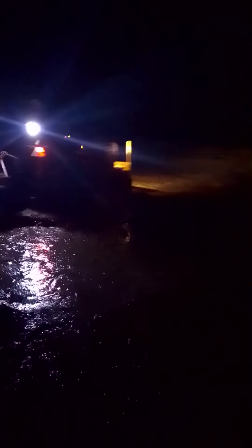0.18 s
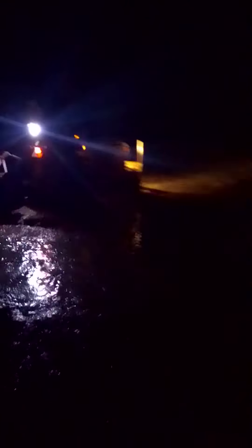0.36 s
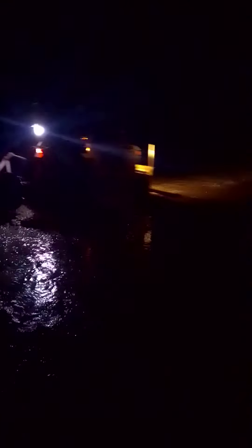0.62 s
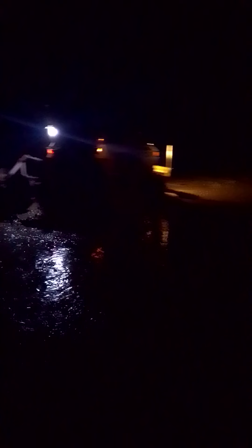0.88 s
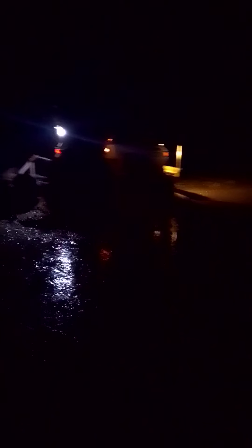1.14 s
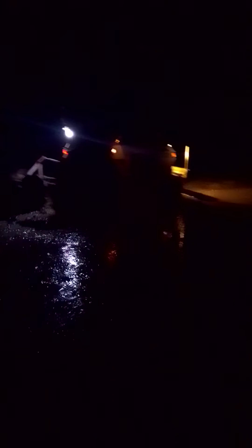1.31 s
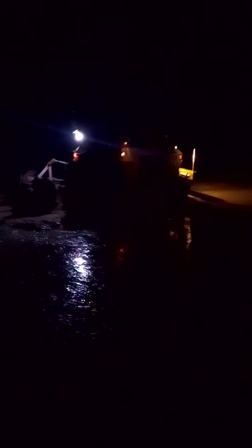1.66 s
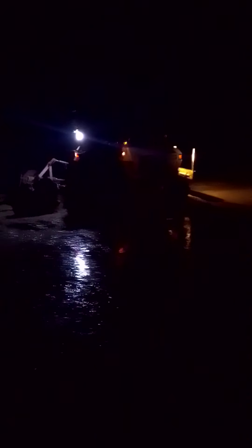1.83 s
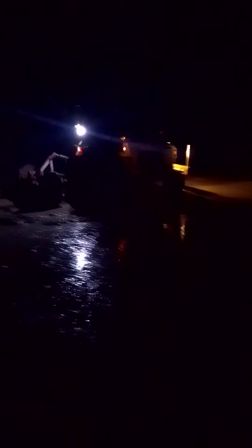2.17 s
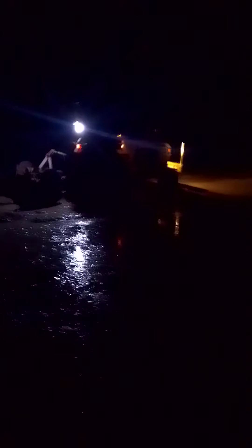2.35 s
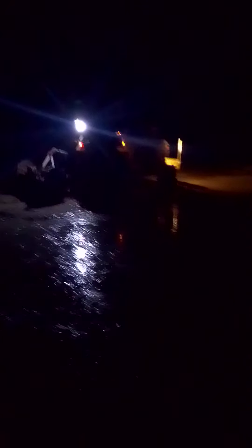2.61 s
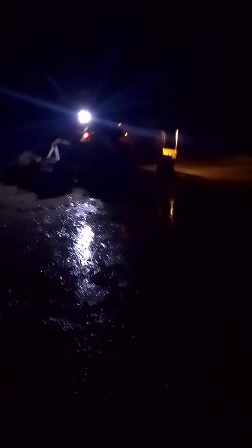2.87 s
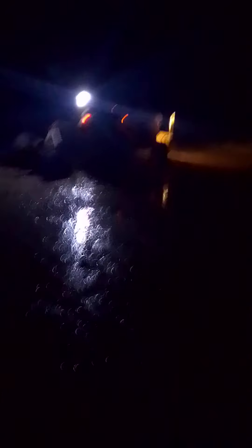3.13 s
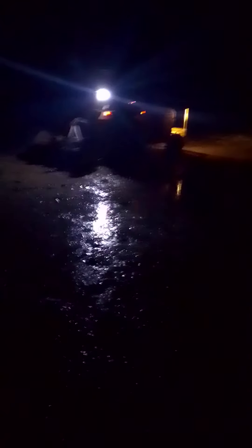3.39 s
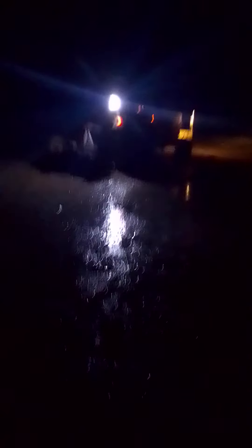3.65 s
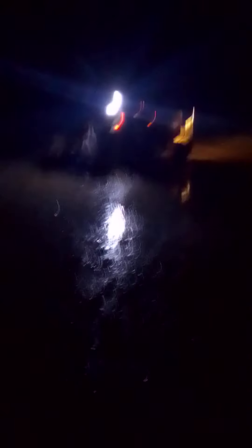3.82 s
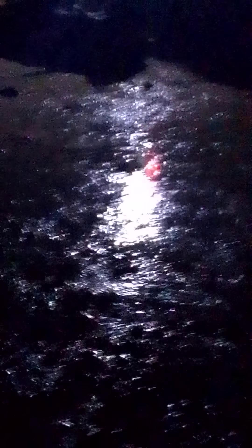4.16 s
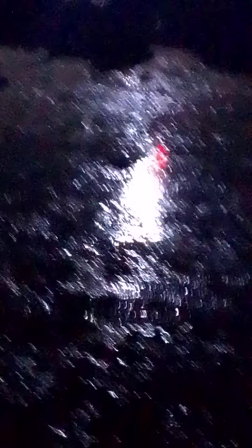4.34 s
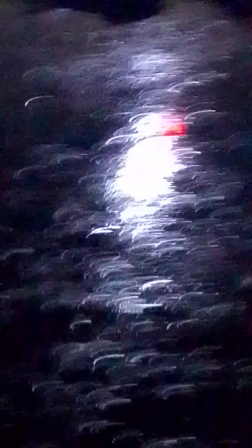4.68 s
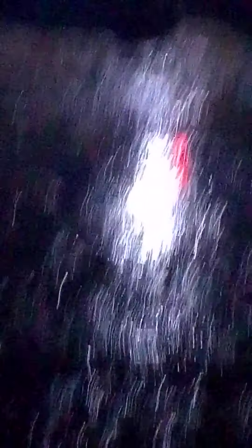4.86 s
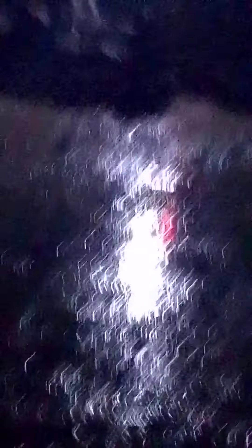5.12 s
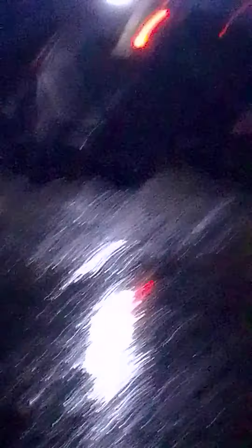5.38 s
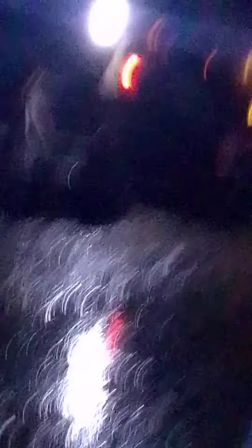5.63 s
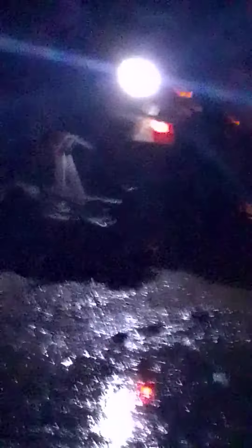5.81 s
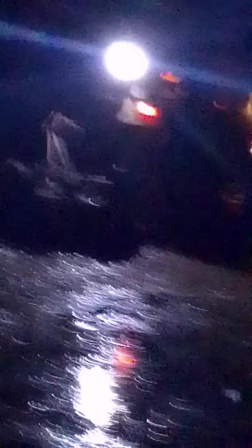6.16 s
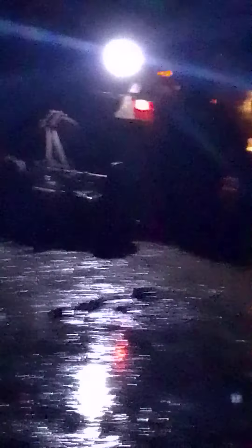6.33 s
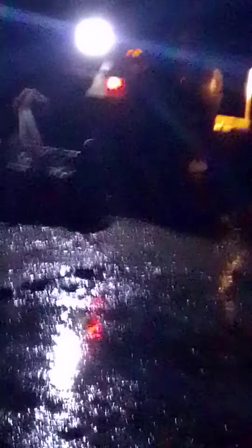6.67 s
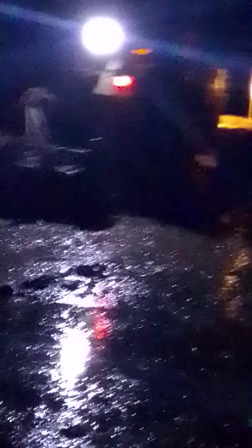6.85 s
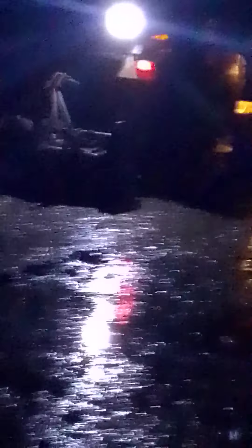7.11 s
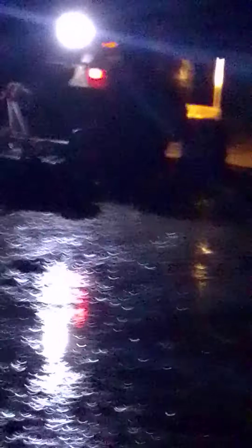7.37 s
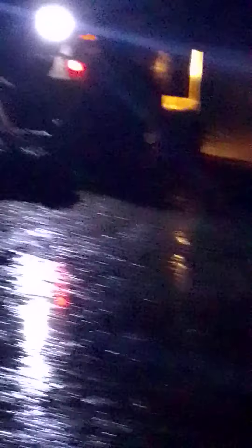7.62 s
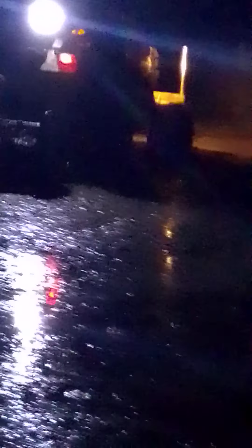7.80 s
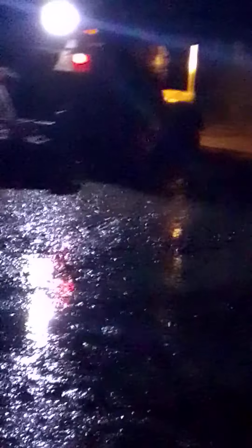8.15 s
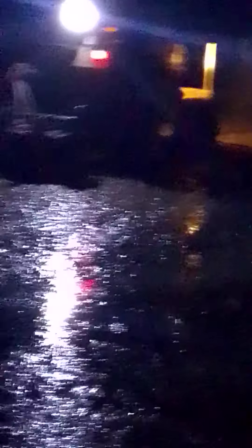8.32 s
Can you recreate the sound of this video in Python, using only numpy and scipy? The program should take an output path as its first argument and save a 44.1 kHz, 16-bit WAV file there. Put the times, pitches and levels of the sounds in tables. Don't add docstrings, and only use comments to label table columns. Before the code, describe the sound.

A phone picks up a working tractor some way off across watery mud. Its rapid diesel knocking is uneven, with random harder blows ringing like struck iron. Gear noise and a faint whine sit underneath with a blurred exhaust drone. Loose tackle shakes brightly early on, with later brief jolts; the sound gets weaker, thinner and patchier towards the end.

```python
import sys
import numpy as np
from scipy import signal
from scipy.fft import rfft, irfft, next_fast_len
from scipy.io import wavfile
from scipy.ndimage import uniform_filter1d, map_coordinates

SR = 44100
rng = np.random.default_rng(int(sys.argv[2]) if len(sys.argv) > 2 else 0)


def unload_wav(signal):
    wavfile.write(
        sys.argv[1],
        SR,
        np.round(np.clip(np.atleast_2d(signal).T, -1, 1) * 32767).astype(np.int16),
    )


def decibels_to_gain(level_db):
    exponent = np.asarray(level_db, float) / 20
    return 10 ** exponent


N = 374409

FIRING_HZ = 32.8
MEAN_DB = -40
HIGH_CUT_DB = -24


def in_time(rows, t):
    s, *columns = np.transpose(rows)
    return [np.interp(t, s, column) for column in columns]


def colour(x, spectrum):
    size = next_fast_len(N)
    hz, level_db = np.transpose(spectrum)
    axis = np.log(np.fft.rfftfreq(size, 1 / SR) + 1)
    gain = decibels_to_gain(np.interp(axis, np.log(hz), level_db, -120, -120))
    y = irfft(rfft(x, size) * gain, size)[:N]
    return y / np.sqrt(np.mean(y ** 2))


def drift(rate):
    knots = rng.standard_normal(600)
    return np.interp(np.arange(N) / SR * rate, np.arange(600), knots)


def ring(clicks, hz, t60):
    r, w = decibels_to_gain(-60 / (t60 * SR)), 2 * np.pi * hz / SR
    return signal.lfilter([0, np.sin(w)], [1, -2 * r * np.cos(w), r * r], clicks + 1e-18)


def between(x, low, high, soft):
    return 0.23 * (1 + np.tanh((x - low) / soft)) * (1 + np.tanh((high - x) / soft))


# (time [s], lead [firings])
CRANK_LEAD = [(0.0, .17), (0.8, 0.33), (1.2, 0.46), (1.6, 0.4), (2.4, 0.3), (3.2, 0.41), (4.8, 0.54),
              (6.0, 0.3), (6.4, .38), (7.2, 0.22), (7.6, 0.28), (8.49, 0.091)]


def count_firings(t):
    return FIRING_HZ * t + in_time(CRANK_LEAD, t)[0]


def strikes(firings):
    return np.flatnonzero(np.diff(np.floor(firings - .76)) > 0)


# (time [s], level [dB], gear load [dB])
LOUDNESS = [(0.0, -38.5, 0.5), (0.66, -37, 1.5), (1.06, -38.5, 2), (1.42, -36, 3), (2.05, -35.5, 0),
            (2.91, -38, 0.5), (3.17, -36, 0), (3.64, -39, 1.5), (3.81, -37, -0.5), (3.97, -41.5, 0),
            (4.33, -39.5, 0.5), (5.93, -41, 1), (6.43, -45, 0), (6.62, -42, -1), (7.38, -45, -1.5),
            (8.49, -44.5, 1)]


def engine_load(t):
    return in_time(LOUDNESS, t)


CYLINDER_DB = [-2.5, -7.5, -10]


def bursts(firings, delay, rise_s, fall_s, steady, spread_db, uneven):
    late = firings - delay + 3
    count = late.astype(int)
    age = late % 1 / FIRING_HZ
    size_db = uneven * np.array(CYLINDER_DB)[count % 3] + spread_db * rng.standard_normal(300)[count]
    flare = decibels_to_gain(size_db) * (1 - np.exp(-age / rise_s)) * np.exp(-age / fall_s)
    return rng.standard_normal(N) * (steady + flare)


# (frequency [Hz], level [dB])
BLOCK = [(2150, -38), (2450, -7), (2650, 1), (2800, 3), (3000, 2), (3300, 2.5), (3750, 1), (4200, -3),
         (4800, -8), (5200, -52)]
# (frequency [Hz], level [dB])
VALVES = [(1650, -26), (1850, -2), (2050, -2.5), (2200, -1), (2400, -5), (2700, -7.5), (3200, -33)]


def block(firings):
    at = strikes(firings)
    draws = rng.standard_normal((300, 23))[:len(at)]
    modes = np.zeros(N)
    for k, hz in enumerate(np.linspace(2450, 4800, 22)):
        clicks = np.zeros(N)
        clicks[at] = decibels_to_gain(3.5 * draws[:, k] + .7 * draws[:, 22]) * np.sign(draws[:, k - 1])
        modes += ring(clicks, hz, 0.075)
    steady = .22 + .2 * (firings / 280) ** 3
    noise = bursts(firings, delay=.74, rise_s=.0011, fall_s=.008, steady=steady, spread_db=.8, uneven=1.1)
    valves = bursts(firings, delay=0.84, rise_s=0.0046, fall_s=0.013, steady=0.35, spread_db=-2.5, uneven=0.29)
    return colour(noise + decibels_to_gain(-33.0) * modes, BLOCK) + decibels_to_gain(-5.0) * colour(valves, VALVES)


# (start time [s], end time [s], frequency [Hz], lift [dB])
FACES = [
    (-1, 3.4, 3740, 3),
    (1.5, 5.1, 2200, 5),
    (5.2, 7.1, 2850, 3),
    (1.4, 2.5, 4730, 19),
    (6.6, 6.84, 4880, 14),
    (6.62, 7.05, 1550, 7),
    (5.6, 7.8, 1020, 3),
    (6.8, 9, 2400, 5),
    (4.0, 5.8, 3450, 3),
]


def face_pitch(s):
    early, late = FACES[0], FACES[2]
    return np.interp(s, [early[1], late[0]], [early[2], late[2]])


def face_lift(hz, t):
    lift = 0
    for start, end, face_hz, lift_db in FACES:
        lift = lift + lift_db * between(hz, face_hz * .97, face_hz * 1.03, 40) * between(t, start, end, .1)
    return lift


def ordinary_knocks(firings, level_db):
    over_db, spread_db, detune = 9.5, 1.2, 0.1204
    rows = []
    for i, d in zip(strikes(firings), rng.standard_normal((300, 4))):
        hz = face_pitch(i / SR) * (1 - detune * abs(d[1]))
        rows.append((i / SR, level_db[i] + over_db + spread_db * d[0], hz, *d[2:]))
    return rows


# (first time [s], peak level [dB], ringing [Hz], run length [firings])
HARD_RUNS = [(0.171, -21.5, 3890, 1), (0.3546, -23, 3850, 2), (0.474, -26, 3290, 1), (0.567, -24, 3860, 1),
             (0.6629, -26, 2930, 1), (0.7163, -21, 3730, 1), (0.9288, -24.5, 2160, 1),
             (1.1069, -26.5, 2160, 1), (1.2008, -19, 3710, 1), (1.505, -27.5, 3730, 1),
             (1.5688, -20, 3670, 2), (1.6586, -21, 3080, 2), (1.9036, -25.5, 3870, 2),
             (1.9956, -25, 3400, 3), (2.1181, -24, 3830, 2), (2.209, -25.5, 2780, 3),
             (2.3017, -21, 2840, 2), (2.9387, -24.5, 3520, 2), (3.1194, -22.5, 3720, 1),
             (3.2745, -25.5, 3760, 2), (3.824, -23, 3000, 1), (4.3993, -23, 2675, 1), (4.461, -21, 3180, 1),
             (5.103, -21, 2700, 2), (5.5313, -28, 2750, 3), (5.777, -26.5, 2870, 1), (5.8396, -22, 2856, 3),
             (6.6024, -22.5, 2920, 3), (7.0903, -27.5, 2710, 2), (7.8576, -27.5, 3630, 2)]


def hard_runs():
    spread_db, detune = -1.5, 0.049
    rows = []
    for (s, peak_db, hz, run), draws in zip(HARD_RUNS, rng.standard_normal((30, 4, 4))):
        for k in range(run):
            d, vary = draws[k], k > 0
            rows.append((s + k / FIRING_HZ, peak_db + spread_db * d[0] * vary,
                         hz * (1 + detune * d[1] * vary), *d[2:]))
    return rows


def ringing_knocks(firings, level_db):
    out, length = np.zeros(N + SR), 1800
    click = np.eye(1, length)[0]
    onset = 1 - np.exp(-np.arange(length) / SR / 0.00057)
    for s, peak_db, hz, chance, other in hard_runs() + ordinary_knocks(firings, level_db):
        cluster = ring(click, hz, 0.046)
        cluster = cluster + 0.23 * ring(click, hz + 250 * chance, 0.015)
        cluster = cluster - 0.76 * ring(click, hz + 600 * other, 0.022)
        start = max(round(s * SR), 0)
        out[start:start + length] += decibels_to_gain(peak_db - 7.0) * cluster * onset
    return out[:N]


# (frequency [Hz], level [dB per Hz])
EXHAUST = [(225, -45), (262, -53.5), (320, -13), (363, -2), (388, 1.5), (481, -1), (560, -8), (620, -18),
           (800, -42)]


def exhaust(firings, t, load_db):
    puffs = bursts(firings, delay=.9, rise_s=0.001, fall_s=0.0022, steady=1.3, spread_db=6.0, uneven=0.24)
    level_db = -45.5 + 0.51 * load_db - 0.86 * t + 0.7 * drift(6.0)
    return decibels_to_gain(level_db) * colour(puffs, EXHAUST)


# (frequency [Hz], level [dB])
GEAR = [(540, -55), (600, -9), (880, -10), (990, -6.5), (1120, -10), (1310, -2.5), (1500, -3), (1750, -6.5),
        (1900, -5)]
# (pitch [multiples of the firing rate], level under the gear noise [dB])
WHINES = [
    (24, -18),
    (30, -16),
    (40, -17),
    (50, -23.5),
    (62, -8.5),
]


def gears(firings, t, load_db, pull_db):
    noise = bursts(firings, delay=0.11, rise_s=0.0045, fall_s=0.0062, steady=0.49, spread_db=4.0, uneven=0.47)
    out = colour(noise, GEAR)
    for multiple, under_db in WHINES:
        phase = 2 * np.pi * multiple * firings + 0.73 * drift(14.0)
        out = out + decibels_to_gain(under_db + 5.2 * drift(4.0)) * np.sin(phase)
    level_db = -49 + 0.78 * load_db - 0.1866 * t + pull_db
    return decibels_to_gain(level_db + 3.0) * out


# (start time [s], end time [s], rattle lift [dB], jingle lift [dB])
JOLTS = [
    (-.1, .07, 7.5, 6),
    (-.1, .3, 3.5, 6),
    (.95, 1.15, 1, 3),
    (1.28, 2.227, 5.5, 8),
    (1.453, 1.857, 9.5, 5.5),
    (3.17, 3.445, 2, 8.5),
    (4.45, 4.65, 3, 9),
    (4.75, 4.946, 1.5, 8),
    (5.12, 5.346, 5, 8.5),
    (6.604, 6.906, 6.5, 6.5),
]


def tackle(t):
    load_db = engine_load(t)[0] - MEAN_DB
    rattle_db, jingle_db = -74.5 + 0.88 * load_db, -83 + 0.7 * load_db
    for start, end, rattle_lift, jingle_lift in JOLTS:
        jolt = (1 + np.tanh((t - start) / 0.048)) * (1 + np.tanh((end - t) / 0.059)) / 4
        rattle_db = rattle_db + rattle_lift * jolt
        jingle_db = jingle_db + jingle_lift * jolt
    return rattle_db, jingle_db


def looseness(t):
    return np.clip((tackle(t)[1] + 79 + .7 * t) / 9, 0, 1)


def shaking(knocks, power):
    fast = uniform_filter1d(knocks ** 2, 130)
    shake = (fast / uniform_filter1d(fast, 9000)) ** power
    return rng.standard_normal(N) * shake / np.sqrt(uniform_filter1d(shake ** 2, 9000))


# (frequency [Hz], level [dB])
RATTLE = [(2820, -28), (4800, -3), (5590, -6.5), (6990, -4.5), (7790, -3.5), (8490, -4.5), (9460, -8),
          (9800, -24), (12700, -42), (21600, -120)]
# (frequency [Hz], level [dB])
JINGLE = [(5590, -36), (9500, -4), (10600, -5), (12900, -7), (13800, -9), (15100, -5.5), (15900, -13)]


def loose_parts(knocks, t):
    rattle_db, jingle_db = tackle(t)
    power = .25 + .42 * looseness(t)
    rattle = decibels_to_gain(rattle_db) * colour(shaking(knocks, power), RATTLE)
    return rattle + decibels_to_gain(jingle_db) * colour(shaking(knocks, power), JINGLE)


# (time [s], peak level [dB])
TICKS = [
    (0.384, -57),
    (3.1203, -55),
    (3.8794, -64),
    (4.3994, -65),
    (4.8694, -60),
    (5.1322, -69),
]


def ticks():
    out, age = np.zeros(N + SR), np.arange(600) / SR
    band = signal.butter(2, [5000, 13000], "band", fs=SR, output="sos")
    snaps = signal.sosfilt(band, rng.standard_normal((30, 600)))
    for (s, peak_db), snap in zip(TICKS, snaps):
        start = round(s * SR)
        out[start:start + 600] += decibels_to_gain(peak_db) * snap * np.exp(-age / 0.0038)
    return out[:N]


# (start time [s], end time [s], level [dB])
THROB = [(.17, 1.0, -68), (1.15, 2.092, -66.5), (2.25, 2.882, -69), (3.3, 3.55, -72), (3.8, 4.075, -73),
         (4.5, 4.75, -73), (5.05, 5.353, -72), (5.6, 6.35, -73), (6.75, 6.95, -70), (7.4, 8.094, -74.5),
         (8.22, 8.6, -81)]
# (frequency [Hz], level [dB])
THROB_BAND = [(78, -11), (90, 19), (138, 0), (150, -20)]


def throb(turn, t):
    swell = decibels_to_gain(-92.5)
    for start, end, level_db in THROB:
        swell = swell + decibels_to_gain(level_db) * between(t, start, end, 0.11)
    noise = decibels_to_gain(-9.5) * colour(rng.standard_normal(N), THROB_BAND)
    fourth = decibels_to_gain(-7 + 2.5 * drift(4.0)) * np.sin(4 * turn)
    return swell * (np.sin(3 * turn + 2) + fourth + noise)


# (pitch [multiples of the firing rate], level [dB])
UPPER_ORDERS = [
    (5, -85),
    (6, -96.5),
]


def hum(firings, t):
    turn = 2 * np.pi * firings
    first = decibels_to_gain(-77 - .4 * t + .6 * drift(0.99)) * np.sin(turn)
    second = decibels_to_gain(-72 - .4 * t + .6 * drift(0.99)) * np.sin(2 * turn + 1)
    tones = first + second + throb(turn, t)
    for k, level_db in UPPER_ORDERS:
        tones = tones + decibels_to_gain(level_db + 3.3 * drift(6.7)) * np.sin(k * turn + 0.32 * drift(3.3))
    return np.sqrt(2) * tones


# (frequency [Hz], level [dB])
RUMBLE = [(10, -26), (20, -16), (50, -5), (85, -7), (150, -14), (172, -7), (205, 1), (235, -3.5), (258, -9),
          (300, 7.5), (380, -9)]


def rumble(t):
    return decibels_to_gain(-69.5 + 4.0 - 0.68 * t + 1.0 * drift(9.3)) * colour(rng.standard_normal(N), RUMBLE)


def scene():
    t = np.arange(N) / SR
    firings = count_firings(t)
    level_db, pull_db = engine_load(t)
    block_db = level_db - 2
    load_db = block_db - MEAN_DB
    knocks = decibels_to_gain(block_db) * block(firings) + ringing_knocks(firings, block_db)
    body = knocks + exhaust(firings, t, load_db) + gears(firings, t, load_db, pull_db)
    high = decibels_to_gain(-HIGH_CUT_DB) * (loose_parts(knocks, t) + ticks())
    return (body + high + hum(firings, t) + rumble(t))[None]


def patches(bins, frames, wide, long):
    knots = rng.standard_normal((400, 120))
    grid = np.meshgrid(np.arange(bins) / wide, np.arange(frames) / long, indexing="ij")
    return 1.26 * map_coordinates(knots, grid, order=1, mode="mirror")


# (frequency [Hz], width [Hz], level [dB])
LOOSE_MODES = [(5180, 44, -5), (5800, 52, -4), (6170, 400, -2), (6820, 59, -7), (7750, 140, 0),
               (8330, 130, -5), (9320, 34, -10), (9750, 61, -13), (10260, 69, -12), (11240, 370, -14),
               (12000, 120, -16), (12400, 210, -17), (14900, 310, -18), (15400, 140, -16)]


def rattle_gain(hz, t, above, shape):
    loose = looseness(t)
    ridges = sum(np.exp(-((hz - mode_hz) / (.5 * width + 70)) ** 2) for mode_hz, width, _ in LOOSE_MODES)
    gain_db = above * loose * (8 * ridges + 5 * patches(*shape, wide=2.4, long=50) - 6.5)
    holes = sum(np.exp(-((hz - hole_hz) / 110) ** 2) for hole_hz in [10500, 10850, 11850, 13550, 14050])
    shut = np.clip(.5 + 2 * patches(*shape, wide=4.0, long=9.0), 0, 1)
    return gain_db - 30 * holes * loose * shut


# (time [s], top edge [Hz], dip low [Hz], dip high [Hz], dip level [dB])
VALLEY = [(0.0, 4540, 1540, 1850, -11), (0.9, 4510, 1550, 1730, -7), (2.1, 4530, 1510, 1780, -3.5),
          (2.8, 4380, 1570, 1780, -2), (3.35, 4390, 1640, 1920, -8), (3.6, 4270, 1720, 1987, -21),
          (4.3, 4180, 1590, 2150, -19), (4.75, 4170, 1785, 2050, -27), (5.1, 3980, 1620, 2120, -27),
          (5.45, 4380, 1540, 2290, -18), (5.8, 4390, 1476, 1930, -20), (6.4, 4200, 1550, 2020, -16),
          (6.8, 4240, 1565, 1850, -23), (7.3, 4230, 1410, 1990, -12), (8.49, 4150, 1410, 1890, -20.5)]
# (low [Hz], high [Hz], shut time [s], open time [s], depth [dB])
WEAK = [(1121, 1214, 4.9, 5.9, -24), (1121, 1214, 6.1, 9, -15), (556, 711, 4.85, 5.15, -14),
        (556, 711, 5.15, 5.95, -9), (570, 711, 5.95, 9, -17), (784, 916, 4.85, 9, -11),
        (700, 916, 4.85, 5.15, -14), (1900, 2270, 7.2, 9, -12), (2280, 2520, 6.22, 6.56, -11),
        (1430, 1600, 6.0, 6.58, -9), (920, 1060, .15, .35, -12), (1950, 2200, 5.7, 7.2, -5),
        (2300, 2520, 4.6, 5.5, -7), (2130, 2260, 7.3, 9, -8), (700, 916, 6.35, 6.6, -9)]


def suppressor(x):
    hz, t, frames = signal.stft(x, SR, nperseg=1024, noverlap=768)
    hz = hz[:, None]
    top_hz, low_hz, high_hz, valley_db = in_time(VALLEY, t)
    above = between(hz, top_hz, SR, 130)
    gain_db = HIGH_CUT_DB * above + valley_db * between(hz, low_hz, high_hz, 48)
    for low, high, start, end, depth_db in WEAK:
        always_db = -1.5 / 4 * (high < 1300)
        gain_db += between(hz, low, high, 32) * (depth_db * between(t, start, end, 0.037) + always_db)
    gain_db += face_lift(hz, t)
    gain_db += 1.9 * between(hz, 560, SR, 50) * patches(*frames.shape, wide=2.2, long=40)
    gain_db += rattle_gain(hz, t, above, frames.shape)
    return signal.istft(frames * decibels_to_gain(gain_db), SR, nperseg=1024, noverlap=768)[1][:N]


def roll_off(x):
    return signal.sosfilt(signal.butter(12, 16470, fs=SR, output="sos"), x)


def record(dry):
    mix = suppressor(dry[0])[None]
    return roll_off(mix)


dry = scene()
out = record(dry)
unload_wav(out)
```